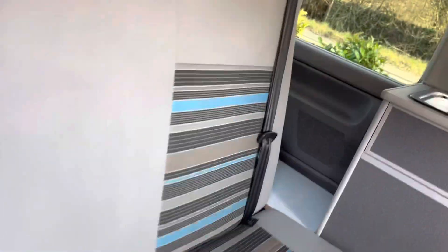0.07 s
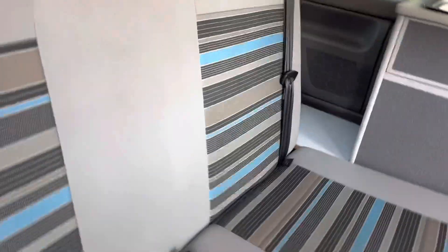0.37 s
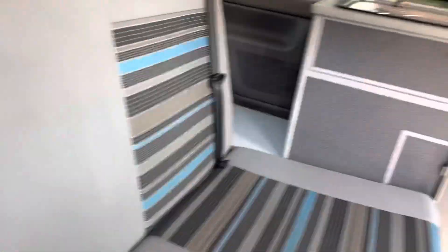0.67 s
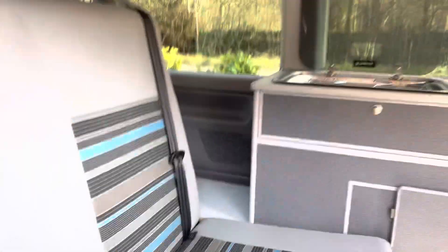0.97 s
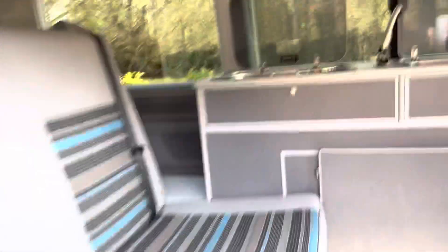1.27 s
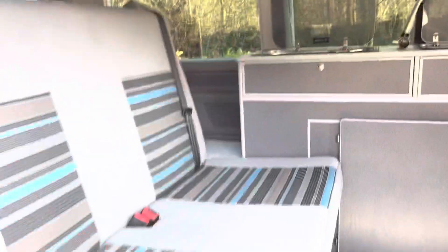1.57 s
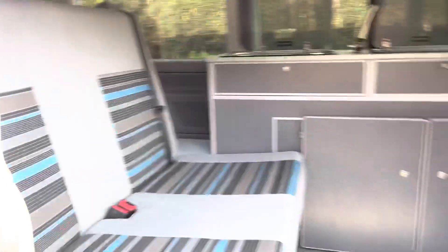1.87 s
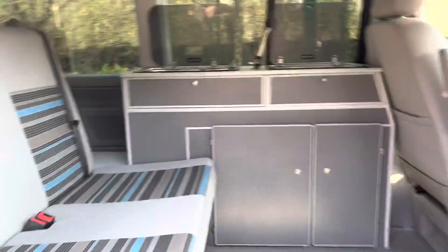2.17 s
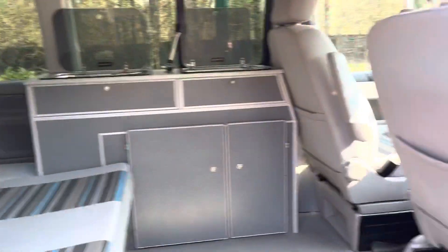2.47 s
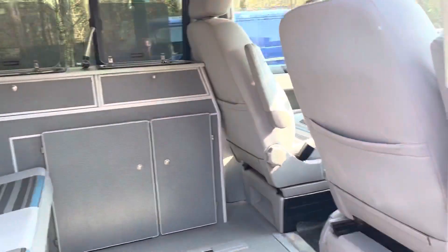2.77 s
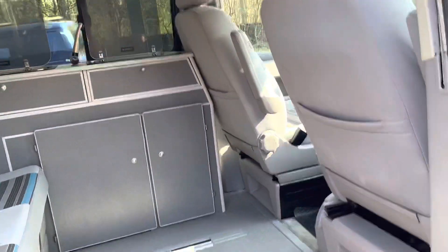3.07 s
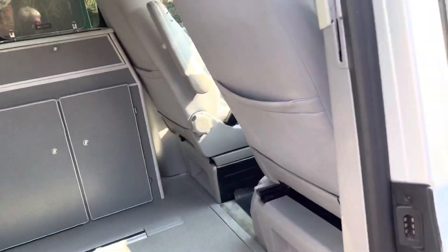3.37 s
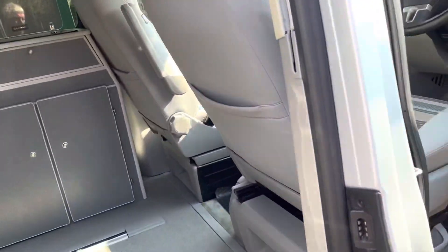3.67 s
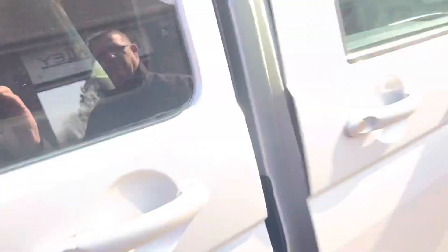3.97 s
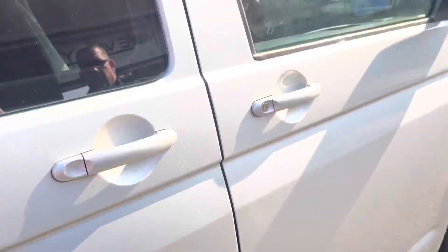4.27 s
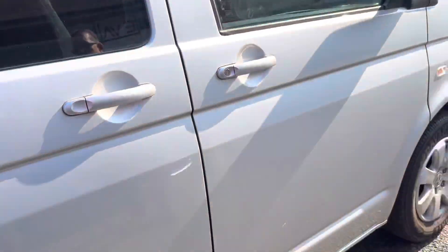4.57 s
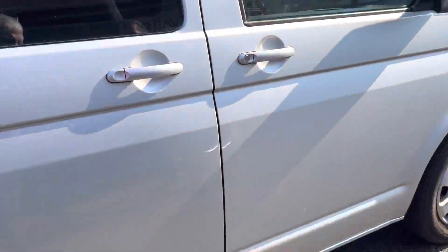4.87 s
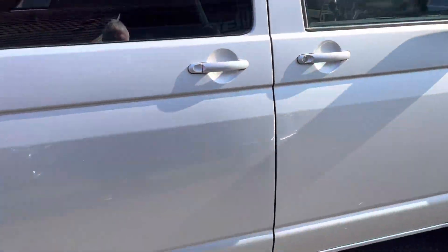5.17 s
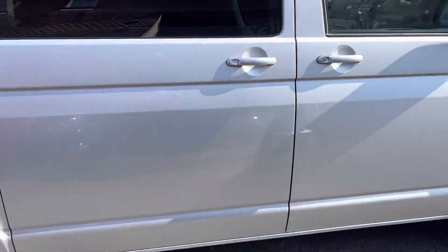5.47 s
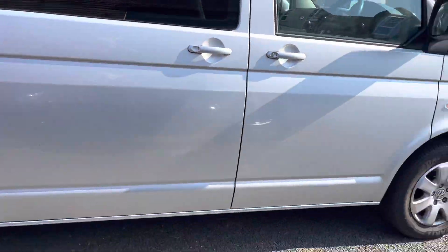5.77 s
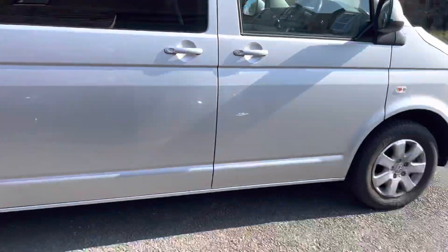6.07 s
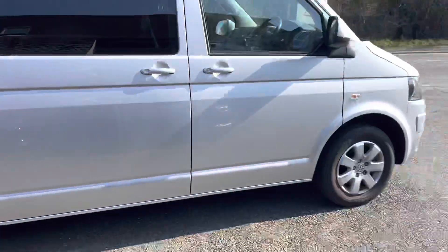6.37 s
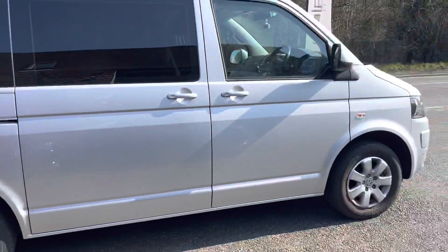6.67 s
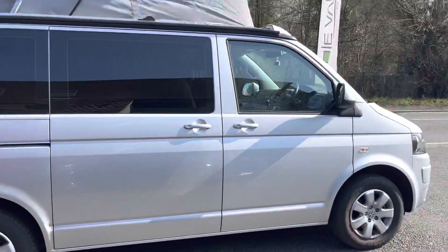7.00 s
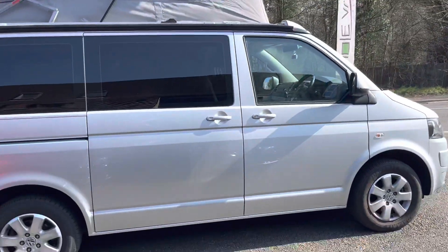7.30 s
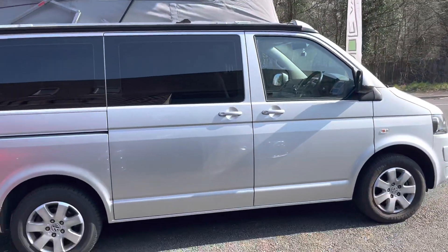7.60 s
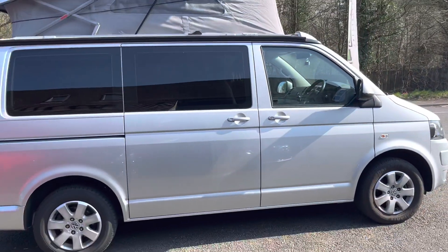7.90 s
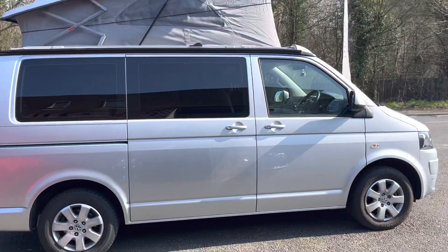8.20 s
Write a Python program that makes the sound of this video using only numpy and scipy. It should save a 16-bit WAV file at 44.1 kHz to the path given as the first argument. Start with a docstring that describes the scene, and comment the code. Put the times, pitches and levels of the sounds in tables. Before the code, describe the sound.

A van's sliding door, heard from a handheld phone close by, clicks free, rumbles and hums along its rail, then shuts with a loud, booming slam and a clack of the latch. Cars pass on the nearby road before and after, the last one the loudest. The person holding the phone steps back with soft thuds and small gritty crunches, amid low wind rumble and a faint, far bird.

```python
"""A van's sliding door is unlatched, rolls along its track and slams, beside a road where cars pass.
Rollers excite the track's resonances; the slam's impacts ring the body, panels, latch and cabin air.
The first car fades away; the next two swell and fade, the last briefly in the van's acoustic shadow.
The person holding the phone steps back over gritty tarmac, wind nudges the microphone, a far bird calls.
The phone's limiter squashes the slam and lets the road swell back after it."""
import sys
import numpy as np
from scipy import signal
from scipy.fft import rfft, irfft
from scipy.io import wavfile
from scipy.ndimage import uniform_filter1d, minimum_filter1d

SR = 44100
rng = np.random.default_rng(int(sys.argv[2]) if len(sys.argv) > 2 else 0)


def bounce(signal):
    """Save signal as a 16-bit WAV file at the path given by the first command-line argument."""
    frames = np.transpose(np.atleast_2d(signal))
    limited = np.clip(frames, -1, 1)
    pcm = np.round(limited * 32767).astype(np.int16)
    wavfile.write(sys.argv[1], SR, pcm)


N = 367794
TIME = np.arange(N) / SR

# damping of small steel parts, in latch and rollers: freq_hz, t60_s
STEEL_DAMPING = [(300, 0.0193), (1500, 0.026), (4000, 0.11), (12000, 0.017)]


def door_blows(push_s=0.0054, rattle_db=-20, latch_db=-12):
    """Impact excitation: each blow rings body, panels and latch; the closing seal booms the cabin air."""
    # the door leaves its catch, then latch, seal and lock meet:
    # start_s, boom_db, panel_db, flex_db, clack_db, clack_tilt_db_per_octave
    blows = [(3.0336, -35, -18, -26, -16, 2), (3.0356, -50, -13.5, -22, -14, -3.5),
             (4.0285, -7, -5.5, -18, -4, -9), (4.037, -20, -10.5, -22, -7.5, -2.5),
             (4.0427, -4.5, -7, 9.5, -19, -5), (4.0767, -11.5, -4.5, 2, -4, -2.5),
             (4.083, -19, -4, 2, -12, -9), (4.095, -28, -11, -14, -7, -11), (4.099, -2, -7, -5, -2, -2),
             (4.107, -18, -23, -7, -10, -10), (4.116, -1.5, -16, -18, -22, -8),
             (4.126, -28, -16.5, -15, -13, -10), (4.146, -24, -20, -18, -23, -9),
             (4.183, -30, -23, -35, -29, -2)]
    # modes of the van's body and of the steel latch: pitch_hz, level_db, t60_s
    body_modes = [(50, -0.5, .08), (91.5, 7.5, 0.16), (107.7, 1, 0.362), (158, 3, 0.22), (166.4, -5, 0.325),
                  (241.5, -12, 0.38), (279, -0.5, 0.2), (331, -6.5, 0.092), (431, -21.5, 0.24),
                  (484, -14, 0.19), (643, -18, 0.16)]
    latch_modes = [(854, -34, 0.088), (1000, -6.5, 0.08), (1480, 2.5, 0.049), (1950, -4, 0.03),
                   (2297, -12, 0.0613)]
    # spectra of struck panels and steel: freq_hz, level_db
    panel_spectrum = [(40, -22.5), (110, -3.5), (200, 0), (330, 3.5), (470, -6), (600, -4), (850, -9),
                      (1300, -13), (2200, -17), (5000, -27.5), (14000, -45)]
    steel_spectrum = [(200, 10.5), (700, -6), (1150, 14.5), (1700, -21), (2250, 10.5), (2800, -20.5),
                      (3600, -8.5), (5000, -32.5), (6500, -6), (8300, -9), (9700, -5), (13500, -23.5),
                      (15500, -24)]
    # damping of panels and rattling parts: freq_hz, t60_s
    panel_damping = [(60, 1), (200, 0.3), (450, 0.18), (1000, 0.17), (2500, 0.16), (6000, 0.18),
                     (14000, 0.2)]
    rattle_damping = [(1000, 0.12), (4000, 0.085), (11000, 0.11)]
    out, t = np.zeros((2, N)), np.arange(16384) / SR
    boom = damped_modes(body_modes, t) * (1 - np.exp(-t / push_s))
    for start_s, boom_db, panel_db, flex_db, clack_db, tilt_db in blows:
        load = rng.uniform(.975, 1.025)  # the load on the latch shifts its pitch
        latch = damped_modes(latch_modes, t, tuning=load, random_phase=True)
        rattle = gain_of(rattle_db) * ring(steel_spectrum, rattle_damping, tilt_db)
        clack = ring(steel_spectrum, STEEL_DAMPING, tilt_db) + rattle + gain_of(latch_db) * latch
        panel = gain_of(panel_db) * ring(panel_spectrum, panel_damping) + gain_of(flex_db) * flex()
        add(out, start_s, gain_of(boom_db) * boom + panel + gain_of(clack_db) * clack)
    add(out, start_s=4.112, sound=cabin_boom(t))
    return out


def cabin_boom(t, pitch_hz=59.3, level_db=7, rise_s=0.011, t60_s=0.36):
    """Cavity resonance: the air trapped in the cabin rings in one low mode."""
    return damped_modes([(pitch_hz, level_db, t60_s)], t) * (1 - np.exp(-t / rise_s))


def flex(high_hz=1400, low_hz=280, glide_s=0.00423, fade_s=0.0038, onset_s=.0007):
    """Dispersion: the high frequencies of a bending wave in a struck sheet arrive first."""
    t = np.arange(16384) / SR
    hz = low_hz + (high_hz - low_hz) * np.exp(-t / glide_s)
    soft_start = 1 - np.exp(-(t / onset_s) ** 2)
    return tone(hz) * np.exp(-t / fade_s) * soft_start


def rollers(bumps_per_s=1800, flutter=0.1, rattles_per_s=40):
    """Roughness excitation: rollers jolt over tiny bumps, shake door and track, and rattle."""
    # the door's travel: time_s, rumble_db, track_ring_db, share_of_top_speed
    travel = [(3.13, -44, -39, 0.74), (3.25, -29, -33, 0.92), (3.295, -23.5, -24.5, 0.84),
              (3.334, -25.5, -33, 0.9), (3.45, -22.5, -23.5, 0.89), (3.487, -23.5, -34.5, 0.92),
              (3.545, -21.5, -21.5, 0.94), (3.566, -22, -39, 0.92), (3.61, -21, -24, 0.96),
              (3.64, -21, -29, 0.91), (3.69, -22, -14.5, 0.99), (3.708, -21.5, -34, 1),
              (3.726, -20.5, -17.5, 0.96), (3.791, -20, -20, 1), (3.825, -23.5, -15, 1),
              (3.859, -19.5, -25, 1), (3.93, -19.5, -23, 0.9), (4.02, -22.5, -22.5, 0.94)]
    # spectra of the rumbling door and of a roller's tap: freq_hz, level_db
    rumble_spectrum = [(30, -13), (60, -7), (120, -8), (250, -3.5), (400, -6), (560, -14.5), (720, -16.5),
                       (1050, -12), (1300, -21.5), (2000, -31), (2800, -48), (4500, -49), (8000, -50.5),
                       (13000, -59.5)]
    tap_spectrum = [(400, -15), (900, 12), (1800, 1), (3600, -7.5), (6000, -21.5), (13000, -34)]
    times, rumble_db, track_db, pace = np.transpose(travel)
    t = np.arange(times[0], times[-1] + .025, 1 / SR)
    shape = (2, len(t))
    bumps = unit_rms(rng.standard_normal(shape) * (rng.random(shape) < bumps_per_s / SR))
    jolts = bumps + 1.4 * rng.standard_normal(shape)
    jolts *= np.exp(flutter * band_noise(len(t), centre_hz=22, octaves=0.65))
    track = track_ring(jolts, speed=np.interp(t, times, pace))
    door = coloured(jolts[:, ::-1], lambda hz: read(rumble_spectrum, hz))
    rasp = coloured(jolts, hump(centre_hz=2170, octaves=0.56))
    taps = rng.uniform(.4, 1, len(t)) * (rng.random(len(t)) < rattles_per_s / SR)
    tap_ring = ring(tap_spectrum, STEEL_DAMPING)
    rattle = unit_rms(signal.fftconvolve(taps[None], tap_ring, axes=1)[:, :len(t)])
    rumble = gain_of(-2) * door + gain_of(-24) * rasp + gain_of(-22.5) * rattle
    sound = gain_of(np.interp(t, times, rumble_db)) * rumble
    sound += gain_of(np.interp(t, times, track_db) - 1.5) * track
    out = np.zeros((2, N))
    add(out, t[0], sound * signal.windows.tukey(len(t), .04))
    return out


def track_ring(jolts, speed, top_sing_hz=464, sing_share=0.45, waver_depth=0.04):
    """Forced resonance: jolts ring the track and one roller sings; both rise in pitch with speed."""
    # modes of track and carriage: top_speed_pitch_hz, width_hz, level_db
    track_modes = [(244, 19, -7), (417.5, 45, 7.5), (488, 65, 11), (665, 30, -5.5), (900, 130, -8),
                   (1160, 120, -15), (1760, 98, -11), (2080, 130, -32)]
    track = unit_rms(sum(gain_of(db) * resonate(jolts, hz * speed, width)
                         for hz, width, db in track_modes))
    waver = 1 + waver_depth * band_noise(len(speed), centre_hz=30.2, octaves=0.83)
    sing = unit_rms(tone(top_sing_hz * speed * waver))
    return np.sqrt(1 - sing_share) * track + np.sqrt(sing_share) * sing


def catch(ring_db=-18.5, clunk_db=-1.5, swell_s=0.0056):
    """Free vibration: the steel hold-open catch rings as it lets go, and the freed roller arm clunks."""
    # modes of the catch and of the arm: pitch_hz, level_db, t60_s
    catch_modes = [(1155, 3, .05), (2195, 6.5, 0.03), (2390, 2, 0.025), (3140, -3, 0.08), (3450, -9, 0.069),
                   (4630, -5.5, 0.037), (4813, -5, 0.045), (5950, -4.5, 0.03), (6740, -10, 0.05),
                   (9640, -1, 0.033), (10500, -11, 0.038)]
    arm_modes = [(99, -9.5, 0.15), (164, -8, 0.14), (247, -9, 0.091), (333, 2, 0.055), (449, -13, 0.11),
                 (626, -19.5, 0.063), (888, -15.5, 0.11)]
    out, t = np.zeros((2, N)), np.arange(16384) / SR
    add(out, start_s=3.0355, sound=gain_of(ring_db) * damped_modes(catch_modes, t, random_phase=True))
    clunk = damped_modes(arm_modes, t) * (1 - np.exp(-t / swell_s))
    add(out, start_s=3.039, sound=gain_of(clunk_db) * clunk)
    return out


def traffic(hiss_db_per_octave=0.5, going_db_per_octave=-3):
    """Broadband radiation: engines drone, tyres roar and hum, and their hiss dulls as each car leaves."""
    # spectra of engine drone, tyre roar and tyre hiss: freq_hz, level_db
    drone_spectrum = [(70, -4.5), (150, -2), (250, 2), (350, -5), (480, -3), (620, -3), (900, -18),
                      (2500, -87)]
    roar_spectrum = [(300, -66), (600, -10), (800, 1), (1000, -0.5), (1300, -4), (1600, -7), (2000, -16),
                     (2600, -23), (3500, -31.5), (8000, -72)]
    hiss_spectrum = [(1200, -2.5), (2600, 1.5), (3500, 2.5), (4500, 0.5), (6000, -10), (7300, -6.5),
                     (8400, -24), (10000, -14), (13500, -31), (15000, -34.5)]
    # treads singing in the roar: middle_s, half_length_s, pitch_hz, glide_hz_per_s, lift_db, width_octaves
    tread_hums = [(0.64, 0.34, 1264, -450, 10, 0.25), (0.867, 0.57, 800, -330, 10, 0.2),
                  (1.809, 0.57, 1200, 108, 5.5, 0.3), (4.687, 0.3, 1018, -1, 11, 0.14),
                  (5.042, 0.11, 1002, -4, 9.5, 0.11), (5.0, 0.11, 823, -2, 8.5, 0.1),
                  (5.05, 0.12, 1550, 1, 1, 0.5), (6.3, 1, 986, -29, 2.5, 0.153),
                  (6.603, .4, 2190, -150, 3.5, 0.12)]
    times = TIME[::256]
    drone_db, roar_db, hiss_db, brightness, bearing, going = passing_cars(times)

    def rush_db(t, hz):
        """A broad 3 dB lift of the last car's tyre noise, just before the van screens it."""
        return 3 * bell(t, middle=5.126, half_width=.2) * bell(np.log2((hz + 1) / 3410), 0, 4.1)

    def tread_db(t, hz):
        """Tread hums are gliding peaks in the roar; brightness tilts it about 1 kHz."""
        hums = 0
        for middle_s, half_s, pitch_hz, glide, lift_db, octaves in tread_hums:
            centre_hz = np.maximum(pitch_hz + glide * (t - middle_s), 1)
            hums += lift_db * bell(t, middle_s, half_s) * bell(np.log2((hz + 1) / centre_hz), 0, octaves)
        tilt = np.interp(t, times, brightness) * np.clip(np.log2((hz + 1) / 1000), -1, 1)
        return hums + rush_db(t, hz) + tilt

    def fizz_db(t, hz):
        """Directivity: tyres throw their fizz above 4 kHz forward."""
        slope = hiss_db_per_octave + going_db_per_octave * np.interp(t, times, going)
        return rush_db(t, hz) + slope * np.log2(np.maximum(hz / 4000, 1))

    drone = gain_of(np.interp(TIME, times, drone_db)) * wash(drone_spectrum, patchy_db=2.5)
    roar = gain_of(np.interp(TIME, times, roar_db)) * wash(roar_spectrum, 1.5, tread_db)
    hiss = gain_of(np.interp(TIME, times, hiss_db) - .5) * wash(hiss_spectrum, 1.6, fizz_db)
    return ports(drone + roar + hiss, lambda t: np.interp(t, times, bearing))


def passing_cars(t, level_off_s=0.1, turn_s=0.49, hiss_lead_s=0.12, far_brightness=27, far_bearing=-0.38):
    """Incoherent sources add in power: the first car fades away; the next two swell and fade."""
    # cars going by: pass_s, slope_before_db_per_s, fade_after_db_per_s, drone_db, roar_db, hiss_db,
    # brightness_db_per_octave, bearing_before, bearing_after (positive is left)
    cars = [(0.4, -6.5, 7, -41.5, -39, -59, -3.5, 0.15, -1.08),
            (2.45, 15.5, 4, -34, -35, -52.5, 0.5, -0.65, -0.51),
            (5.6, 11.5, 8, -25, -20.5, -45, 0.5, -0.84, 0.94)]
    # rows are drone, roar and hiss; far traffic sets their floor
    power = gain_of([[-67], [-49], [-63]]) ** 2 * np.ones(len(t))
    # power-weighted sums: the loudest car sets colour and bearing
    bright_sum, bearing_sum, going_sum = power[1] * far_brightness, power[1] * far_bearing, power[2]
    for pass_s, slope, fade, drone_db, roar_db, hiss_db, brightness, before, after in cars:
        since = t - pass_s + np.array([[0], [0], [hiss_lead_s]])  # hiss, thrown forward, comes early
        away_db = np.where(since < 0, slope, fade) * (np.hypot(since, level_off_s) - level_off_s)
        car_power = gain_of(np.array([[drone_db], [roar_db], [hiss_db]]) - away_db) ** 2
        going = np.tanh((t - pass_s) / turn_s)  # -1 coming, 1 going
        power = power + car_power
        going_sum = going_sum + car_power[2] * going
        bright_sum += car_power[1] * (brightness - 0.2 * going)
        bearing_sum += car_power[1] * (before + (after - before) * (1 + going) / 2)
    loss_db, dulling = van_shadow(t)
    levels_db = 10 * np.log10(power) - loss_db
    return (*levels_db, bright_sum / power[1] - dulling, bearing_sum / power[1], going_sum / power[2])


def van_shadow(t, middle_s=5.705, half_s=0.34, drone_db=5.5, roar_db=10.5, hiss_db=7, dull_db_per_octave=2):
    """Acoustic shadow: the van weakens each layer of the last car's sound and dulls its roar."""
    shadow = 1 / (1 + ((t - middle_s) / half_s) ** 4)
    return np.outer([drone_db, roar_db, hiss_db], shadow), dull_db_per_octave * shadow


def steps(thud_db=-10):
    """Damped impacts: footfalls and dull knocks are each a falling chirp and a thud."""
    # footfalls and knocks: start_s, level_db
    knocks = [(.282, -16.5), (2.140, -19), (2.864, -21), (2.905, -27), (4.58, -18.5), (4.747, -21),
              (5.664, -16), (5.927, -20.5), (6.159, -15), (6.183, -15.5), (7.167, -20), (7.257, -19.5),
              (7.593, -23), (7.926, -21.5), (8.16, -23)]
    # spectrum of a thud: freq_hz, level_db
    thud_spectrum = [(80, -4.5), (300, 12.5), (520, 5), (900, -12), (1300, -6.5), (2200, -26), (6000, -40),
                     (14000, -68.5)]
    # its damping: freq_hz, t60_s
    thud_damping = [(150, 0.43), (500, 0.048), (1200, 0.11), (6000, 0.084)]
    out = np.zeros((2, N))
    for start_s, db in knocks:
        add(out, start_s, gain_of(db) * (flex() + gain_of(thud_db) * ring(thud_spectrum, thud_damping)))
    return out


def grit(snap_s=0.00033, crumble_db=-12, crumble_s=0.0042, crackle_start_s=6.27, crackle_hz=3900):
    """Brittle fracture: each grain gives a sharp snap of noise and a short crumbling tail."""
    # grit under shoes and rollers: start_s, level_db, centre_hz
    snaps = [(0.355, -35, 2885), (2.907, -26, 2320), (3.298, -34, 4400), (3.767, -28, 7456),
             (3.896, -36, 2600), (4.334, -34, 3800), (5.664, -28, 3060), (6.053, -25, 3400),
             (6.147, -23, 2780), (6.153, -21, 2900), (6.158, -23, 2900), (6.217, -23.5, 3100),
             (6.248, -38, 9030), (6.42, -29, 3400)]
    out, t = np.zeros((2, N)), np.arange(1024) / SR
    envelope = (t / snap_s) * np.exp(1 - t / snap_s) + gain_of(crumble_db) * np.exp(-t / crumble_s)
    # finer grit crackles as the sole rolls off it
    crackle = [(crackle_start_s + .05 * when, -33.5 + 6 * force, crackle_hz)
               for when, force in rng.random((4, 2))]
    for start_s, db, hz in snaps + crackle:
        add(out, start_s, gain_of(db - 6) * band_noise((2, len(t)), hz, octaves=0.65) * envelope)
    return out


def scuffs_and_hiss(clumping=0.068, grain_samples=30):
    """Amplitude-modulated noise: grainy swells make scuffs, rustles and one long, high hiss."""
    # scuffs and rustles; the row at 0.843 s is a faint, long, high hiss as the second car approaches:
    # start_s, length_s, level_db, centre_hz, width_octaves
    swells = [(0, 0.12, -50.5, 3900, 0.82), (0.843, 1.13, -62, 11540, 3.8), (2.127, 0.039, -49, 4500, 0.77),
              (2.888, 0.038, -37.5, 2300, 0.3), (2.874, 0.073, -50.5, 7450, 0.42),
              (3.03, 0.0092, -19, 6400, 0.75), (3.269, 0.056, -50, 4870, 1.7),
              (3.874, 0.045, -44, 3200, 0.9), (3.808, 0.021, -36, 2190, 0.13),
              (3.863, 0.065, -27.5, 1720, 0.3), (4.087, 0.022, -16, 2300, 0.15),
              (4.387, 0.16, -40, 2500, 0.77), (4.283, .3, -57, 11500, 0.56),
              (5.813, 0.046, -50, 5800, 0.69), (5.885, 0.081, -39, 2850, 1.22),
              (6.033, 0.4, -52.5, 3900, 0.76), (6.14, 0.045, -41.5, 2390, 1.02),
              (7.053, 0.087, -55.5, 5000, 0.76)]
    out, size = np.zeros((2, N)), 2 * SR
    for start_s, length_s, db, hz, octaves in swells:
        grains = rng.standard_normal((2, size))
        grains *= np.repeat(rng.rayleigh(1, size // grain_samples), grain_samples)
        grains *= np.exp(clumping * band_noise(size, centre_hz=108, octaves=0.604))
        swell = np.hanning(round(length_s * SR))
        add(out, start_s, gain_of(db) * coloured(grains, hump(hz, octaves))[:, :len(swell)] * swell)
    return out


def wind_and_rumble(breeze_db=-43):
    """Low-frequency noise: wind on the microphone, a rumble lingering after the slam, and soft bumps."""
    # spectrum of the rumble: freq_hz, level_db
    rumble_spectrum = [(15, -18.5), (25, -35), (42, -24.5), (60, 4.5), (85, -5.5), (120, -3), (180, -15.5),
                       (320, -46), (800, -62)]
    # swells of wind; the row at 4.36 s is the low rumble after the slam: middle_s, half_length_s, level_db
    swells = [(0, 0.78, -33.5), (2.65, 0.59, -33), (3.27, 0.13, -32), (4.36, 0.13, -30.5),
              (5.201, 0.86, -34.5), (6.02, 0.22, -29), (7.25, 0.2, -41), (8.35, .2, -42.5)]
    # bumps and puffs of air on the phone: start_s, level_db, pitch_hz, length_s
    bumps = [(0.105, -20, 100, 0.051), (0.157, -19, 174, 0.02), (0.654, -27, 99, 0.025),
             (1.14, -24.5, 90, 0.025), (1.173, -25.5, 57, 0.066), (1.368, -28, 83, 0.0214),
             (4.996, -18.5, 77, 0.03), (8.139, -29.5, 59.4, 0.095)]
    power = gain_of(breeze_db) ** 2 + sum(gain_of(db) ** 2 * bell(TIME, s, half) for s, half, db in swells)
    out = np.sqrt(power) * wash(rumble_spectrum, patchy_db=1.5)
    for start_s, db, hz, length_s in bumps:
        t = np.arange(0, length_s, 1 / SR)
        add(out, start_s, gain_of(db) * np.sin(2 * np.pi * hz * t) * np.sin(np.pi * t / length_s))
    return out


def bird(direct_db=-9, sag_octaves_per_s=0.42):
    """Scattering: trees blur each faint, sagging note of a far bird into a soft band."""
    # the bird's notes: start_s, length_s, level_db, start_hz, blur_hz
    notes = [(1.318, 0.28, -61, 4120, 600), (1.348, .12, -62, 2900, 150), (1.9, 0.1, -53, 4150, 600),
             (1.922, 0.06, -56, 3560, 250), (2.36, 0.18, -56, 4150, 750), (2.64, 0.13, -57, 4000, 550),
             (6.0, 0.15, -54, 4190, 750), (7.165, 0.09, -55, 3920, 450), (8.099, .22, -63, 3200, 250),
             (7.644, 0.26, -73, 9000, 400), (7.82, 0.25, -68, 8200, 500)]
    out = np.zeros((2, N))
    for start_s, length_s, db, start_hz, blur_hz in notes:
        t = np.arange(0, length_s, 1 / SR)
        hz = start_hz * 2 ** (-sag_octaves_per_s * t)
        scattered = resonate(rng.standard_normal((2, len(t))), hz, blur_hz)
        note = unit_rms(scattered + gain_of(direct_db) * tone(hz))
        add(out, start_s, gain_of(db) * note * signal.windows.tukey(len(t), .7))
    return out


def ports(pair, bearing, lag_s=0.00049, shade_db=2, below_hz=1700):
    """Partial coherence: two ports hear much the same sound; below_hz caps the bearing's delay and shade."""
    # likeness of the two ports: freq_hz, coherence
    likeness = [(60, 0.98), (250, 0.9), (500, 0.75), (1000, 0.43), (2000, 0.48), (4000, 0.206),
                (7000, 0.94), (10000, 0.88)]
    # their balance: freq_hz, left_over_right_db
    balance = [(100, 1), (500, 0.1), (1000, 0), (1550, -7), (1800, 3), (2500, 1), (4500, 7), (7500, 0)]
    # a fixed left-right phase offset that hollows the treble near 8 and 14 kHz: freq_hz, offset_rad
    treble_offset = [(1800, 0), (3000, 1.1), (4700, 1.1), (6500, -.9), (7600, -3), (9500, -3.3),
                     (10500, -6.2), (13400, -6.3), (14100, -9.4)]
    hz, t, (common, independent) = signal.stft(pair, SR, nperseg=512, noverlap=384)
    hz = hz[:, None]
    coherence = np.clip(read(likeness, hz), 0, 1)
    side = (hz < below_hz) * bearing(t)
    phase = read(treble_offset, hz) + 2 * np.pi * hz * lag_s * side
    shade_band = gain_of(hump(centre_hz=750, octaves=.6)(hz))
    lean = gain_of((read(balance, hz) + shade_db * side * shade_band) / 2)
    right = (coherence * common + np.sqrt(1 - coherence ** 2) * independent) * np.exp(-1j * phase)
    return signal.istft(np.array([common * lean, right / lean]), SR, nperseg=512, noverlap=384)[1][:, :N]


def damped_modes(modes, t, tuning=1, random_phase=False):
    """Modal superposition: a sum of exponentially decaying sines."""
    out = 0
    for hz, db, t60 in modes:
        phase = rng.random((2, 1)) if random_phase else 0
        out += gain_of(db - 60 * t / t60) * np.sin(2 * np.pi * (tuning * hz * t + phase))
    return out


def ring(spectrum, damping, tilt_db=0, rise_cycles=0.38, size=16384):
    """Modal overlap: dense modes merge into noise, each band building up and dying at its own rate."""
    t, hz = np.arange(size) / SR, np.fft.rfftfreq(size, 1 / SR)
    noise = rng.standard_normal((2, size))
    bins = rfft(coloured(noise, lambda f: read(spectrum, f) + tilt_db * np.log2(f + 1)))
    centres, t60s = np.transpose(damping)
    bands = [irfft(bins * read(np.c_[centres, own], hz)) for own in np.eye(len(centres))]
    return sum(band * gain_of(-60 * t / t60) * (1 - np.exp(-t * centre / rise_cycles))
               for band, centre, t60 in zip(bands, centres, t60s))


def wash(spectrum, patchy_db, moving_db=lambda t, hz: 0, size=2048):
    """Spectral shaping: noise of rms 1 with drifting patches and an optional moving colour."""
    hop = size // 4
    t, hz = np.arange(0, N + size, hop)[:, None] / SR, np.fft.rfftfreq(size, 1 / SR)
    shape = (2, len(t), len(hz))
    bins = rng.standard_normal(shape) + 1j * rng.standard_normal(shape)
    drift = uniform_filter1d(rng.standard_normal(shape[1:]), size=6, axis=0)
    patches = unit_rms(uniform_filter1d(drift, size=14, axis=1))
    bins *= gain_of(read(spectrum, hz) + patchy_db * patches + moving_db(t, hz))
    _, noise = signal.istft(bins, nperseg=size, noverlap=size - hop, time_axis=1, freq_axis=2)
    return unit_rms(noise[:, :N])


def resonate(x, hz, width_hz):
    """Two resonators in cascade that follow the curve hz, scaled to rms 1."""
    carrier = np.exp(2j * np.pi * np.cumsum(hz) / SR)
    pole = np.exp(-np.pi * width_hz / SR)
    for _ in range(2):
        x = (carrier * signal.lfilter([1 - pole], [1, -pole], x / carrier)).real
    return unit_rms(x)


def tone(hz):
    """A sine whose phase is the integral of the curve hz."""
    return np.sin(2 * np.pi * np.cumsum(hz) / SR)


def band_noise(shape, centre_hz, octaves):
    """Band-passed noise of rms 1."""
    return coloured(rng.standard_normal(shape), hump(centre_hz, octaves))


def coloured(x, colour):
    """Filters x by colour(hz) in dB, to rms 1."""
    size = x.shape[-1]
    return unit_rms(irfft(rfft(x) * gain_of(colour(np.fft.rfftfreq(size, 1 / SR))), size))


def hump(centre_hz, octaves):
    """A Gaussian band on the octave axis, in dB."""
    return lambda hz: -10 * np.log10(np.e) * (np.log2((hz + 1) / centre_hz) / octaves) ** 2


def bell(x, middle, half_width):
    """A Gaussian swell of height 1."""
    return np.exp(-((x - middle) / half_width) ** 2)


def read(points, hz):
    """Interpolates a table on a log-frequency axis."""
    freq_hz, value = np.transpose(points)
    return np.interp(np.log(hz + 1), np.log(freq_hz + 1), value)


def gain_of(db):
    """Decibels to amplitude."""
    return 10 ** (np.asarray(db) / 20)


def unit_rms(x):
    """Scales to rms 1."""
    return x / np.sqrt(np.mean(x ** 2) + 1e-20)


def add(mix, start_s, sound):
    """Adds a sound to both channels from start_s."""
    part = mix[:, max(round(start_s * SR), 0):][:, :sound.shape[-1]]
    part += sound[..., :part.shape[1]]


def scene(van_bearing=0.58):
    """Superposition: door, steps, wind and bird share the van's bearing; the traffic has its own."""
    door = rollers() + catch() + door_blows()
    van_side = door + steps() + grit() + scuffs_and_hiss() + wind_and_rumble() + bird()
    return ports(van_side, lambda t: van_bearing) + traffic()


def record(dry, limit_db=1, recover_db_per_s=48, hold_s=.06, ceiling=.94, low_hz=32, high_hz=15100):
    """Peak limiting: a low cut, quick attack, short hold and slow recovery, a soft ceiling, a high cut."""
    dry = signal.sosfilt(signal.butter(2, low_hz, "highpass", fs=SR, output="sos"), dry)
    peak_db = 20 * np.log10(abs(dry).max(0) + 1e-9)
    peak_db = np.maximum(peak_db, np.interp(TIME - hold_s, TIME, peak_db))
    fall_db = TIME * recover_db_per_s
    over_db = np.maximum(np.maximum.accumulate(peak_db + fall_db) - fall_db - limit_db, 0)
    reduction_db = uniform_filter1d(-minimum_filter1d(-over_db, size=64), size=64)
    limited = dry / gain_of(reduction_db)
    limited /= (1 + (limited / ceiling) ** 8) ** (1 / 8)
    high_cut = signal.firwin(255, high_hz, window=("kaiser", 9), fs=SR)
    return signal.oaconvolve(limited, high_cut[None], "same")


dry = scene()
out = record(dry)
bounce(out)
```